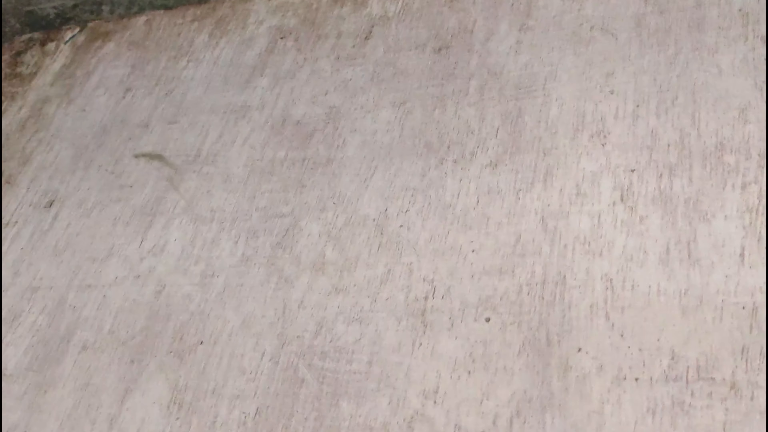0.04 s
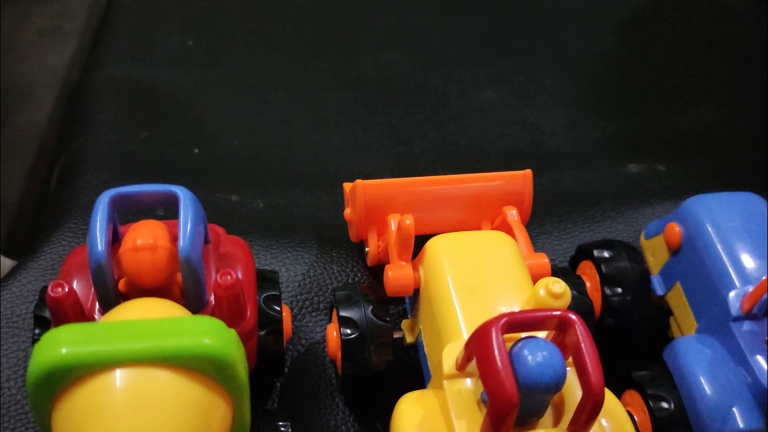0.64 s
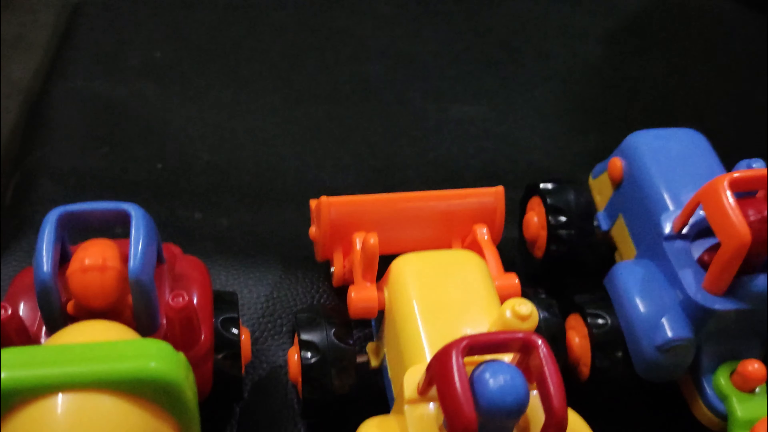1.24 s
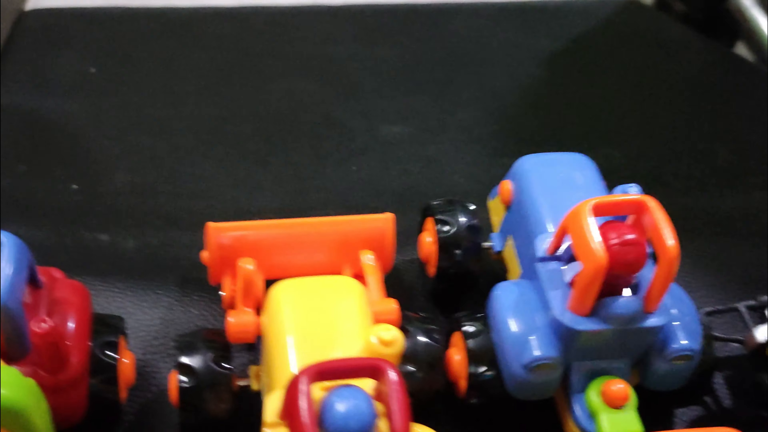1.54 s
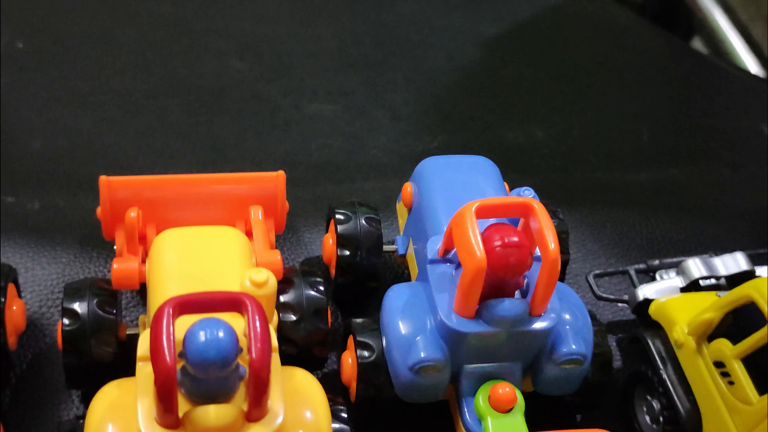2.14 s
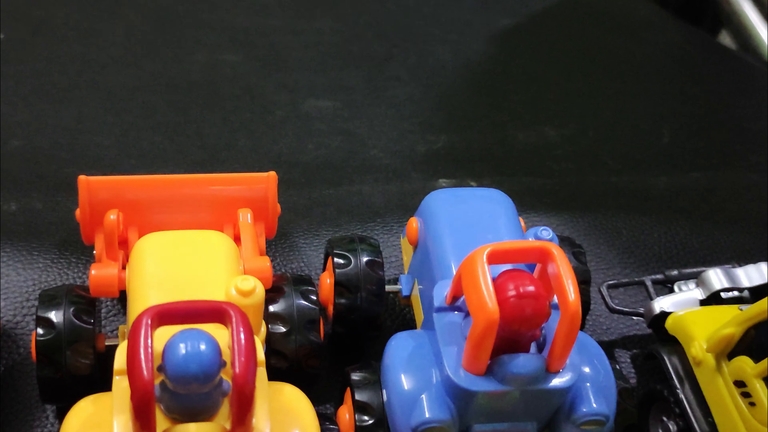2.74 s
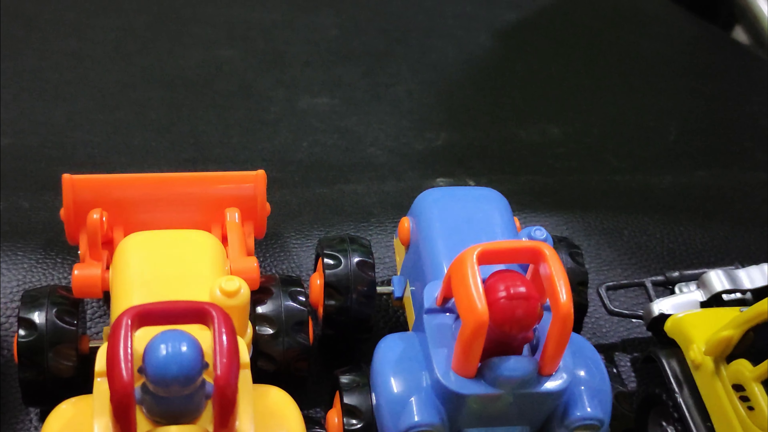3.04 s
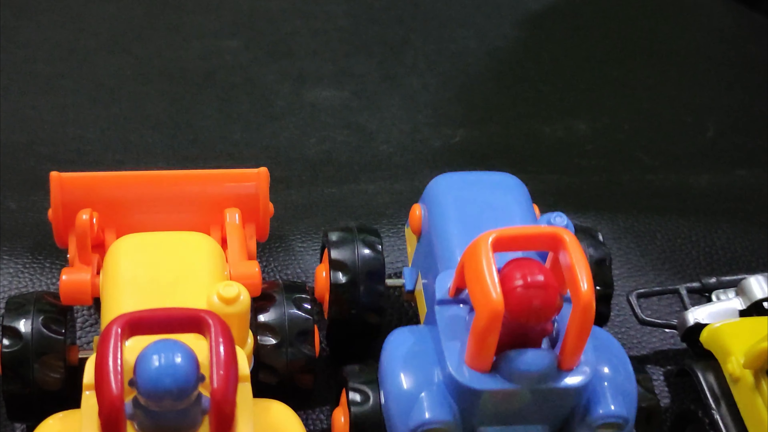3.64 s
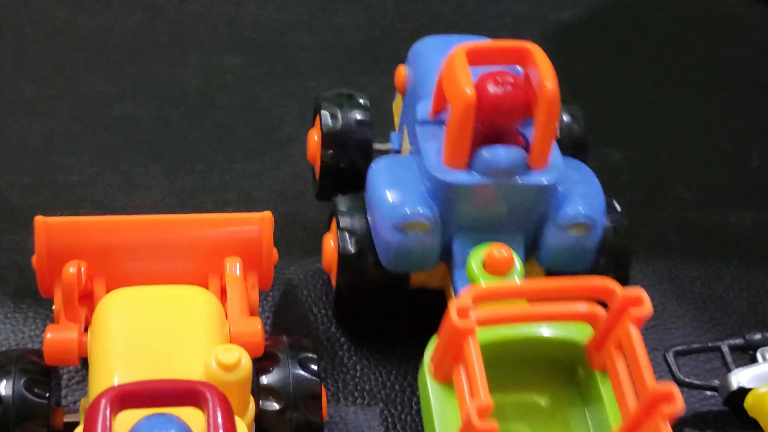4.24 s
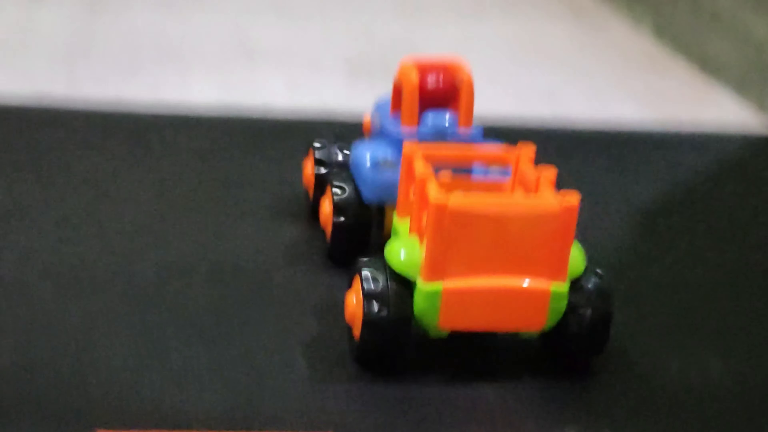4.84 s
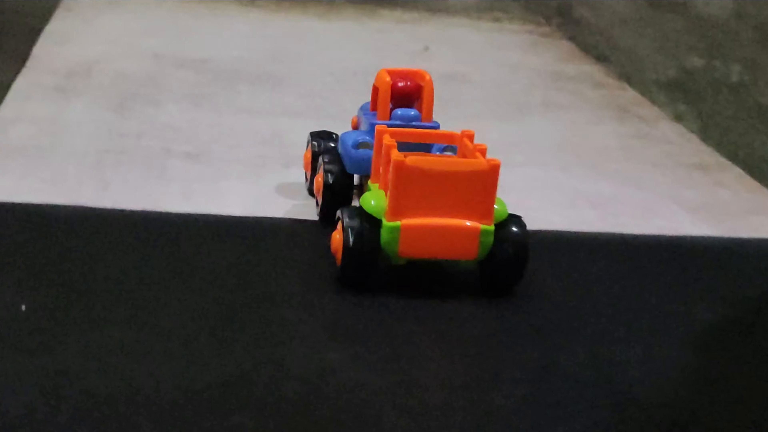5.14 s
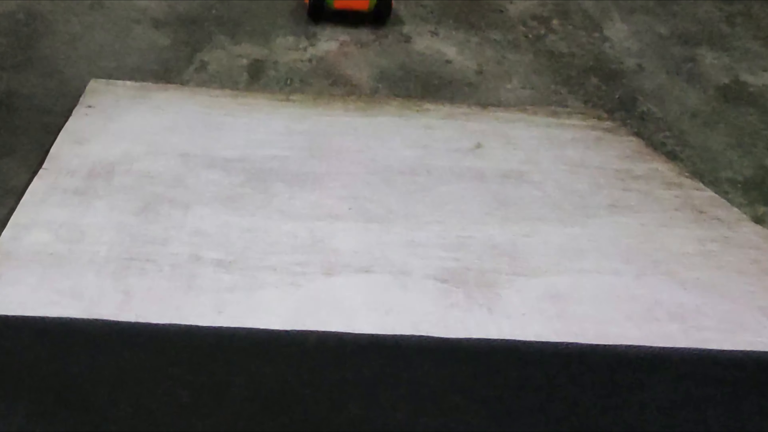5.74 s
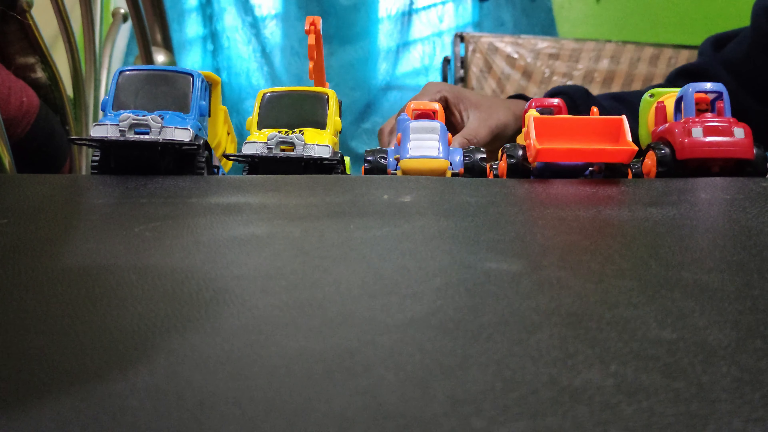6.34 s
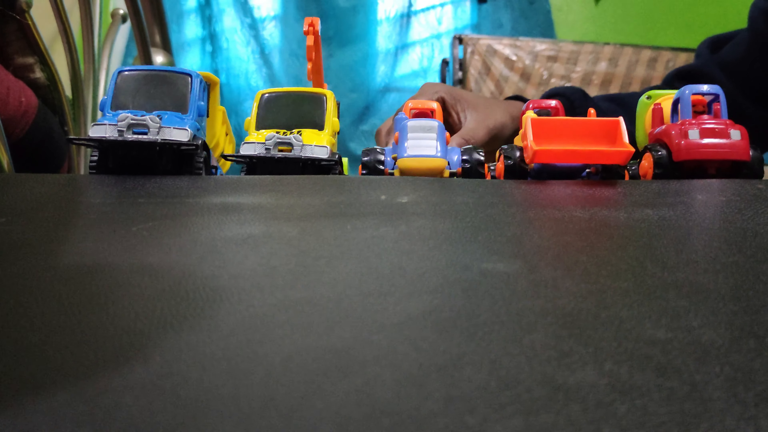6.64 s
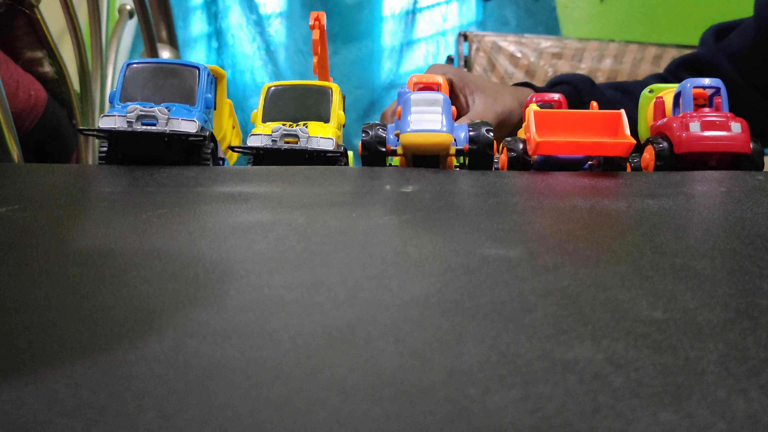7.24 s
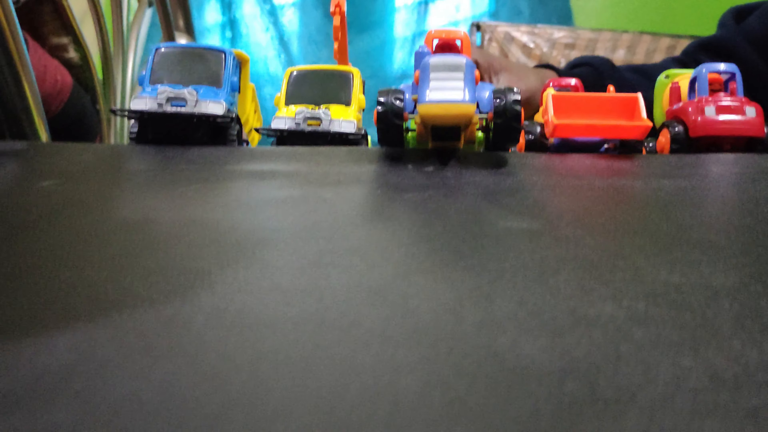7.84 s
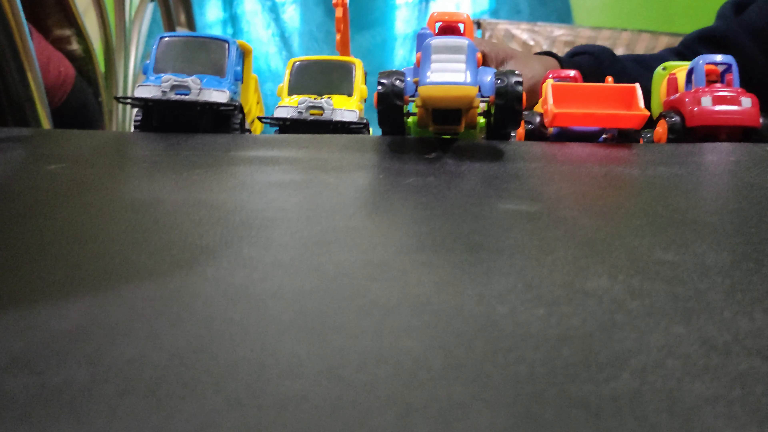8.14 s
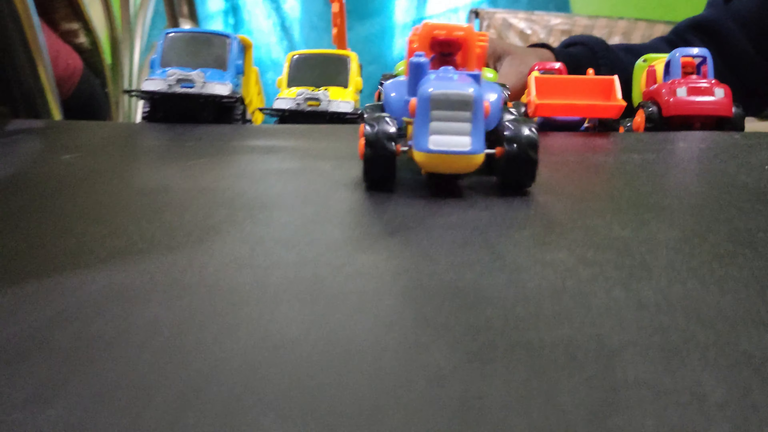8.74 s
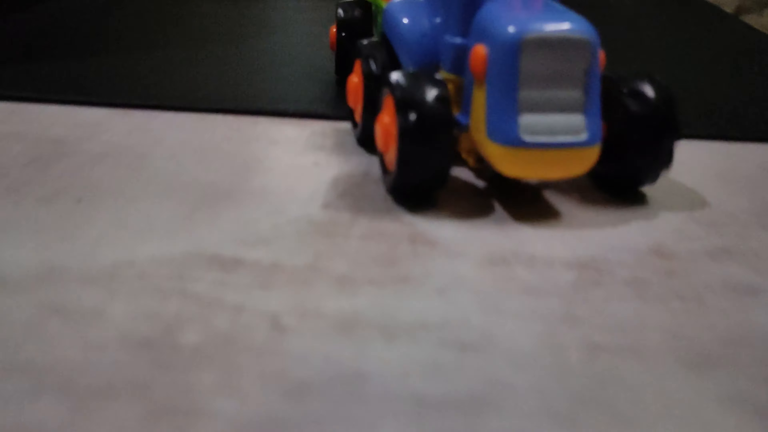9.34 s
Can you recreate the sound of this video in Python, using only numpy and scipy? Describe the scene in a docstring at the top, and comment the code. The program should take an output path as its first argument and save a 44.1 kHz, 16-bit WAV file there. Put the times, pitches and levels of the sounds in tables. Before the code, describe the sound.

A plastic toy tractor clicks, rolls away with a rising gear whir and crashes, then rolls back toward the microphone in a quiet room.

```python
"""Toy tractor on a mat and board

A plastic tractor with a geared flywheel is handled, then rolls twice, close to the microphone in a quiet room.
Nudged, its gear teeth tick one by one; let go down the slope, they merge into a rising whir. Shell and trailer
click, wheels thump and rumble. The first run goes away, over mat and board, and ends in a crash on the floor.
Then the scene changes, and the second comes down the mat toward the microphone."""
import sys
import numpy as np
from scipy import signal
from scipy.fft import rfft, irfft
from scipy.io import wavfile
from scipy.ndimage import uniform_filter1d

SR = 44100
rng = np.random.default_rng(int(sys.argv[2]) if len(sys.argv) > 2 else 0)


def master(y):
    """Save y as 16-bit WAV."""
    cut = np.clip(np.atleast_2d(y).T, -1, 1)
    pcm = np.round(cut * 32767)  # scale
    wavfile.write(sys.argv[1], SR, pcm.astype(np.int16))


N = 414540
TIME = np.arange(N) / SR
AWAY_START_S, TOWARD_START_S = 4.40, 8.41
PAUSE_START_S, PAUSE_END_S = 5.931, 6.652
HAND_TEETH_PER_S = 50  # slow turning by hand
BAND_LIMIT_HZ = 7620

# the toy landing on the floor and bouncing: start_s, level_db
LANDINGS = [(5.7851, -12), (5.7885, -9), (5.799, -18), (5.853, -14.5)]
# modes of the board: pitch_hz, level_db, t60_s
BOARD_MODES = [(98, -12, 0.1), (161, 0, 0.15), (208, -2.5, .18), (250, -2.5, 0.2), (323, -9, .2),
               (397.4, -5.5, .22), (455, -8, .2), (571, -6, 0.16), (643, -8, 0.1), (713, -5.5, .18),
               (820, -12, .18), (975, -7, .18)]
# spectra of plastic hiss, sharp crack, hollow knock and slow, dark whir: frequency_hz, level_db
HISS = [(3700, -20), (4250, -13), (5600, -9), (5950, 2), (6220, -1), (6480, 4), (7350, 4), (7700, -4)]
CRACK = [(400, -23), (850, -9), (1250, -10), (1550, -1), (2050, -.6), (2600, -10), (3500, -21), (4100, -33)]
KNOCK = [(250, -11), (380, 0), (540, 1), (720, -3), (950, -5), (1150, -12), (5000, -48)]
WHIR_SLOW = [(500, -22), (1050, -14), (1300, -2), (2250, 1), (2650, -6), (3200, -17), (4300, -27),
             (7000, -26)]


def amp(db):
    """Decibels to gain."""
    return 10 ** (np.asarray(db) / 20)


def unit(x):
    """Scales to rms 1."""
    return x / np.sqrt(np.mean(x ** 2) + 1e-20)


def unit_peak(x):
    """Scales the loudest 4 ms to rms 1."""
    return x / np.sqrt(uniform_filter1d(x ** 2, 176, mode="constant").max() + 1e-20)


def add(mix, start_s, sound):
    """Mixes a sound in at the given time."""
    part = mix[max(round(start_s * SR), 0):][:len(sound)]
    part += sound[:len(part)]


def wander(per_s):
    """Smooth random drift of rms about 1."""
    knots = rng.standard_normal(N // 100)
    return np.interp(TIME * per_s, np.arange(len(knots)), knots)


def swell(start, end, attack_s, release_s):
    """Attack, hold and release, between 0 and 1."""
    return np.clip(np.minimum((TIME - start) / attack_s, (end - TIME) / release_s), 0, 1)


def response(spectrum, size=4096):
    """Causal impulse response of energy 1 with the given spectrum and falling ends."""
    hz, db = np.transpose(spectrum)
    log_hz = np.log(np.fft.rfftfreq(size, 1 / SR) + 1)
    outside = np.maximum(np.log(hz[0]) - log_hz, 0) + np.maximum(log_hz - np.log(hz[-1]), 0)
    curve_db = np.interp(log_hz, np.log(hz), db) - 30 * outside
    log_gain = np.log(amp(np.maximum(curve_db, -90)))
    log_gain -= 4 * np.clip((np.exp(log_hz) - BAND_LIMIT_HZ) / 1500, 0, 1)
    cepstrum = irfft(log_gain)
    cepstrum[1:size // 2] *= 2  # fold to minimum phase
    cepstrum[size // 2 + 1:] = 0
    impulse = irfft(np.exp(rfft(cepstrum)))[:size // 2]
    return impulse / np.linalg.norm(impulse)


def colour(x, spectrum):
    """Passes x through a body with the given spectrum."""
    return signal.oaconvolve(x, response(spectrum))[:len(x)]


def note(t, hz, t60):
    """One dying resonance with a quick onset."""
    return np.sqrt(2) * np.cos(2 * np.pi * hz * t) * amp(-60 * t / t60) * (1 - np.exp(-t / .00043))


def resonate(x, modes, length_s):
    """Drives a set of modes with x."""
    t = np.arange(int(length_s * SR)) / SR
    impulse = sum(amp(db) * note(t, hz, t60) for hz, db, t60 in modes)
    return signal.oaconvolve(x, impulse / np.linalg.norm(impulse))[:N]


def ring(modes, t, damping, spread):
    """Decaying modes; each blow lands elsewhere and shares its force differently."""
    hz, db, t60 = np.transpose(modes)[:, :, None]
    share, detune = rng.standard_normal((2, len(hz), 1))
    decay = amp(db - 60 * t * damping / np.maximum(t60, .005))
    partials = share * decay * np.sin(2 * np.pi * hz * (1 + spread * detune) * t)
    return unit_peak(partials.sum(0))


def burst(t, t60, spectrum):
    """A short dying chatter of contact, coloured by the struck part."""
    decay = amp(-60 * t / t60)
    onset = 1 - np.exp(-t / .0009)
    chatter = colour(rng.standard_normal(len(t)) * decay * onset, spectrum)
    return chatter * np.sqrt(np.sum(decay ** 2) / np.sum(chatter ** 2))


def grains(per_s, spread_db):
    """Tiny random impacts of uneven size, rms 1."""
    size = amp(spread_db * np.minimum(rng.exponential(1, N), 4)) * rng.choice([-1, 1], N)
    return unit(size * (rng.random(N) < per_s / SR))


def effort(start, rise_s, fall_s):
    """The hand presses harder, then lets off."""
    return swell(start, start + rise_s + fall_s, rise_s, fall_s)


def coasting(start, teeth_per_s, gain_per_s):
    """Teeth per second of a toy that speeds up evenly down the slope."""
    return np.maximum(teeth_per_s + gain_per_s * (TIME - start), HAND_TEETH_PER_S)


def by_speed(rate, start, end, db, doubling_db):
    """Gain of a rolling noise: db at 450 teeth per second, more with each doubling of speed."""
    contact = swell(start, end, attack_s=.015, release_s=.12)
    return contact * amp(db + doubling_db * np.log2(rate / 450))


def room_tone():
    """Room air, a wavering hum until the pause and faint far-off tones, each an arch of pitch."""
    # spectrum of the air: frequency_hz, level_db
    air = [(25, -29), (45, -2.5), (85, 1), (140, -3.5), (260, -5.5), (420, -12), (1150, -21), (2100, -24.5),
           (4300, -39.5), (5600, -39), (6100, -31), (7600, -29)]
    # far-off tones: start_s, length_s, top_hz, sag_hz, level_db
    far_tones = [(1.28, .17, 742, 18, -68), (6.64, .14, 480, 4, -64), (6.95, 1.32, 596, 2, -70.5),
                 (7.16, .19, 626, 12, -64), (8.05, .31, 402, 70, -65)]
    hum_hz, hum_db = 200, -65
    out = amp(-59.5) * colour(rng.standard_normal(N), air) * amp(wander(per_s=7.3))
    waver = 1 + .017 * wander(per_s=50)
    fade = amp(1.7 * wander(per_s=39))
    tones = [(hum_hz, amp(hum_db) * (TIME < PAUSE_START_S))]
    for start, length, top_hz, sag_hz, db in far_tones:
        arch = np.sin(np.pi * np.clip((TIME - start) / length, 0, 1))
        gain = amp(db) * swell(start, start + length, attack_s=.04, release_s=.04)
        tones.append((top_hz - sag_hz * (1 - arch), gain))
    for hz, gain in tones:
        out += np.sqrt(2) * gain * fade * np.sin(2 * np.pi * np.cumsum(hz * waver) / SR)
    return out


def room(x, near_db, tail_db, t60):
    """Quick reflections from the board and toys, the nearest wall's echo and a small room's tail."""
    wall_s, wall_db = .0155, -14
    t = np.arange(SR // 2) / SR
    near, far = rng.standard_normal((2, len(t))) * (rng.random((2, len(t))) < 2500 / SR)
    near *= amp(-60 * t / .02) * (t > .002)
    far *= amp(-60 * t / t60) * (t > .012)
    echoes = amp(near_db) * near / np.linalg.norm(near) + amp(tail_db) * far / np.linalg.norm(far)
    echoes[round(wall_s * SR)] += amp(wall_db)
    return x + signal.oaconvolve(x, echoes)[:N]


def rustle():
    """A soft, dull rustle at the start."""
    return amp(-63) * colour(grains(per_s=2500, spread_db=1.5), KNOCK) * (TIME < .123)


def fingers():
    """Soft swells of fine friction on the shell, and a light slide as the grip changes."""
    # fingers rubbing the plastic: start_s, length_s, level_db
    rubs = [(1.101, .18, -61.5), (1.546, 0.11, -61), (1.81, .08, -61), (2.178, 0.066, -62),
            (2.592, 0.35, -65), (3.018, 0.091, -63.5)]
    stroke = np.zeros(N)
    for start, length, db in rubs:
        add(stroke, start, amp(db) * np.hanning(int(length * SR)))
    grip = amp(-71) * swell(3.03, 3.7, attack_s=.012, release_s=.62)
    slide = grip * grains(per_s=3000, spread_db=1.5)
    rub = stroke * grains(per_s=1400, spread_db=.5)
    return colour(rub, CRACK) + amp(-7.5) * colour(rub, HISS) + colour(slide, HISS)


def taps():
    """Small dull taps while the toy is held, a few cycles each."""
    # taps: start_s, level_db, pitch_hz
    touches = [(6.926, -41.5, 315), (7.604, -43, 568), (7.749, -45.5, 595), (7.871, -46, 587),
               (8.08, -46.5, 623), (8.261, -39, 880), (8.406, -44, 1050)]
    out, t = np.zeros(N), np.arange(SR // 20) / SR
    for start, db, hz in touches:
        tap = np.sin(2 * np.pi * hz * t) * amp(-60 * t / .011)
        add(out, start, amp(db - 3.5) * unit_peak(tap))
    return out


def clicks():
    """Plastic parts knock: a crack, a ping, a faint ring of the shell; hard hits add edge and snap."""
    # contacts: start_s, level_db, edge_db, snap_db, ping_hz
    contacts = [(.452, -69, -6, 10, 2600), (.510, -66, -4, 8, 2600), (1.2002, -44, -18, -15, 1900),
                (1.4426, -36.5, -25, -20, 1950), (1.4581, -26, -22, -14, 1650),
                (1.5145, -38.5, -17, -14, 1550), (1.5264, -40, -16, -14, 1750),
                (1.612, -42, -30, -20, 1850), (1.8572, -30, -26, -18, 1900), (2.0496, -56, -8, -12, 2400),
                (2.53, -50, -25, -17, 1900), (2.5646, -51.5, -12, -10, 2400),
                (2.7551, -24.5, -23, -14, 2020), (3.311, -52, -20, -22, 2250),
                (3.7312, -53, -20, -20, 2200), (4.2867, -26.5, -17, -9, 2100), (4.294, -30, -18, -10, 1700),
                (4.3128, -25, -17, -10, 2150), (4.480, -31, -22, -16, 2150), (4.5491, -30, -15, -14, 2150),
                (4.571, -31, -15, -14, 2120), (4.581, -28, -10, -12, 1300), (4.604, -31, -14, -16, 2150),
                (4.6321, -31, -5, -9, 2130), (4.654, -35, -9, -15, 2200), (4.6825, -28, -4, -9, 2150),
                (4.702, -22.5, -5, -9, 2160), (4.7214, -27, -3, -8, 2250), (5.2764, -24, -18, -18, 950),
                (5.3694, -28, -3, -8, 2100), (8.2604, -34.5, -2, -4, 2600), (8.4058, -34, -11, -9, 2200),
                (8.6243, -30, -9, -10, 2000), (8.6617, -35, -4, -7, 1350), (8.7281, -31, -8, -8, 1450),
                (8.7435, -28, -8, -6, 2650), (8.767, -21.5, -6, -10, 2100), (9.362, -20, -6, -16, 1400),
                (9.385, -20, -6, -16, 2100)]
    # modes of the plastic shell: pitch_hz, level_db, t60_s
    shell_modes = [(845, -11, .16), (1534, -1, .19), (2030, -2, .14), (2595, -11, .13), (3470, -18, .11)]
    # spectrum of a hard contact: frequency_hz, level_db
    hard_edge = [(1900, -22), (2550, 5.5), (3000, -4.5), (3450, 2.5), (3900, -15.5), (5300, -18.5),
                 (7000, -25.5)]
    out, t = np.zeros(N), np.arange(SR // 4) / SR
    for start, db, edge_db, snap_db, hz in contacts:
        part = amp(-1.5) * burst(t, t60=.025, spectrum=CRACK) + amp(-4.5) * note(t, hz, t60=.032)
        shell = amp(-19) * ring(shell_modes, t, damping=1, spread=.012)
        edge = amp(edge_db + 2.5) * burst(t, t60=.024, spectrum=hard_edge)
        snap = amp(snap_db) * burst(t, t60=.032, spectrum=HISS)
        add(out, start, amp(db) * (amp(-1.7) * part + shell + edge + snap))
    return out


def thumps():
    """A dropping wheel, or a bump of the held toy, gives the board one low push, then the toy and the board
    ring."""
    # wheels dropping on mat or board, and early low bumps as the held toy is handled: start_s, level_db,
    # knock_db, boom_hz, boom_t60_s
    drops = [(1.737, -46, -75, 112, .3), (1.859, -48, -62, 100, .25), (2.756, -39, -66, 150, .12),
             (4.281, -34, -54, 225, .06), (4.579, -18, -50, 205, .06), (4.602, -24, -54, 205, .06),
             (4.700, -17, -25, 250, .07), (4.7205, -19, -22, 235, .11), (5.216, -17, -20.5, 250, .07),
             (5.276, -22, -19, 170, .18), (5.368, -23, -37, 306, .1), (5.457, -23.5, -22, 315, .08),
             (5.657, -22, -17, 975, .22), (8.591, -29, -41, 355, .09), (8.617, -26, -44, 102, .3),
             (8.743, -27, -40, 270, .025), (8.767, -18.5, -33, 275, .03), (8.791, -33, -29, 240, .2),
             (9.361, -16, -21, 255, .07), (9.384, -17, -24, 110, .12)]
    # spectrum of the low thud: frequency_hz, level_db
    thud = [(40, -29.5), (90, -7), (170, 0), (260, 0), (400, -12), (2000, -53.5)]
    out, t = np.zeros(N), np.arange(SR // 3) / SR
    push = amp(-6.5) * unit_peak(response(thud, size=2 * len(t)))
    upper_modes = [mode for mode in BOARD_MODES if mode[0] > 300]  # rung by a hard knock
    for start, db, knock_db, hz, boom_t60 in drops:
        boom = amp(-5) * note(t, hz, boom_t60) + amp(-13) * burst(t, t60=.15, spectrum=thud)
        board = amp(-18) * ring(BOARD_MODES, t, damping=.64, spread=.013)
        knock = amp(-5.5) * burst(t, t60=.085, spectrum=KNOCK)
        knock += amp(-11.5) * ring(upper_modes, t, damping=1, spread=.013)
        add(out, start, amp(db) * (boom + push + board) + amp(knock_db) * knock)
    return out


def crash(tail_db, t60):
    """The toy hits the floor and bounces; its loose parts clatter and die away."""
    # spectrum of the loose parts: frequency_hz, level_db
    clatter = [(500, -18), (1350, -2), (1750, -7.5), (2150, 4), (2600, -9), (3500, -8), (4200, -16.5),
               (5500, -17.5), (7300, -9.5)]
    since, t = TIME - LANDINGS[0][0], np.arange(SR // 10) / SR
    decay = amp(tail_db - 60 * np.maximum(since, 0) / t60) * (since > 0)
    out = colour(grains(per_s=1500, spread_db=5.5) * decay, clatter)
    for start, db in LANDINGS:
        add(out, start, amp(db) * burst(t, t60=.014, spectrum=clatter))
    return out


def wheels(away, toward):
    """Treads murmur on the soft mat and drum the bare board into its modes."""
    # spectra of the mat, the deeper mat heard from its surface, and the board: frequency_hz, level_db
    mat = [(50, -15), (130, 3), (200, 2.5), (360, -8), (520, -11), (750, -19)]
    mat_near = [(45, -12), (80, 1), (102, 4.5), (135, -3.5), (250, -8.5), (520, -18.5), (750, -33)]
    rumble = [(45, -24.5), (100, -13), (150, -1), (210, -2), (300, 4), (450, -3.5), (980, -1), (1100, -11),
              (1500, -10), (2500, -21), (6000, -52)]
    mat_away = by_speed(away, start=4.1, end=5.26, db=-44.5, doubling_db=4.5)
    mat_toward = by_speed(toward, start=8.57, end=9.5, db=-38.5, doubling_db=1)
    board_away = by_speed(away, start=5.21, end=5.825, db=-39.2, doubling_db=17.5)
    murmur = mat_away * colour(grains(per_s=1100, spread_db=1.5), mat)
    murmur += mat_toward * colour(grains(per_s=1100, spread_db=1.5), mat_near)
    treads = board_away * grains(per_s=1500, spread_db=1.5)
    drumming = resonate(treads, BOARD_MODES, length_s=.25)
    return amp(-2.1) * murmur + amp(-2.23) * colour(treads, rumble) + amp(-9.5) * drumming


def teeth(rate, slop_s, uneven_db):
    """One pulse for each gear tooth, a little early or late, weak or strong; power 1 at any speed."""
    due = np.flatnonzero(np.diff(np.floor(np.cumsum(rate) / SR)))
    late, force = rng.standard_normal((len(due), 2)).T
    struck = np.clip(due + np.round(late * slop_s * SR).astype(int), 0, N - 1)
    pulses = np.zeros(N)
    pulses[struck] = unit(amp(uneven_db * force)) * np.sqrt(SR / rate[due])
    return pulses


def housing(drive):
    """The teeth ring the narrow resonances of the gear housing."""
    # housing modes, heard from the front: pitch_hz, level_db, t60_s
    modes = [(1320, -9, .02), (2090, -12, .045), (2680, 1, .012), (2870, 1, .014), (3450, -11, .03)]
    return resonate(drive, modes, length_s=.1)


def nudged_gears():
    """Turned by hand, the gears run haltingly; each tooth snaps past the next with a tiny scrape."""
    # hand turns, then those facing the microphone: start_s, rise_s, fall_s, level_db, top_teeth_per_s
    turns = [(.57, .25, .12, -57.5, 80), (.96, .1, .12, -65.5, 52), (1.69, .075, .015, -57.5, 63),
             (2.24, .05, .22, -65, 52), (3.76, .1, .3, -61, 64)]
    front_turns = [(6.84, .16, .14, -67, 68), (7.05, .32, .1, -65, 92), (7.66, .04, .14, -69, 85),
                   (8.26, .02, .3, -62, 190)]
    # tick spectra for these two positions: frequency_hz, level_db
    tick = [(1080, -28), (1280, 1), (1700, -.6), (2050, -4), (2600, -11.5), (3050, -16), (3950, -36),
            (5600, -30), (5950, -22), (7200, -18.5)]
    front_tick = [(700, -14), (1100, -8), (1400, 2.5), (1750, -5), (2050, -2), (2400, -9), (2850, -.6),
                  (3950, -25), (7200, -14)]
    slip = np.exp(-np.arange(SR // 100) / SR / .0014)
    out = np.zeros(N)
    for pushes, body, housing_db in [(turns, tick, -24), (front_turns, front_tick, -3)]:
        rate, gain = np.full(N, float(HAND_TEETH_PER_S)), np.zeros(N)
        for start, rise_s, fall_s, db, top in pushes:
            push = effort(start, rise_s, fall_s) ** .4  # speed and loudness follow the effort
            rate = np.maximum(rate, HAND_TEETH_PER_S + (top - HAND_TEETH_PER_S) * push)
            gain = np.maximum(gain, amp(db) * push)
        pulses = teeth(rate * amp(1.2 * wander(per_s=30)), slop_s=.0009, uneven_db=1.2)
        scrape = signal.oaconvolve(pulses, slip / np.linalg.norm(slip))[:N] * rng.standard_normal(N)
        spurts = amp(1.2 * wander(per_s=22))
        ticks = gain * spurts * (.35 * pulses + .9 * scrape)
        out += colour(ticks, body) + amp(housing_db) * housing(ticks)
    return out


def running_gears(rate, body, whir_gain, hiss_gain, scrape_share, flutter_db, housing_db):
    """Fast teeth whine, taking on the body's colour with speed; loose axles scrape and flutter."""
    dark_teeth_per_s, bright_teeth_per_s = 210, 350
    mesh = teeth(rate * (1 + .008 * wander(per_s=70)), slop_s=.000035, uneven_db=2.8)
    low_cut = signal.butter(1, 450, "high", fs=SR, output="sos")
    scrape = signal.sosfilt(low_cut, grains(per_s=7000, spread_db=3.3))
    drive = np.sqrt(1 - scrape_share) * mesh + np.sqrt(scrape_share) * scrape
    flutter = wander(per_s=76)
    drive *= whir_gain * amp(flutter_db * flutter)
    bright = np.sin(np.interp(rate, [dark_teeth_per_s, bright_teeth_per_s], [0, np.pi / 2])) ** 2
    whir = colour(drive * bright, body) + colour(drive * (1 - bright), WHIR_SLOW)
    hiss = colour(grains(per_s=5500, spread_db=3.5) * hiss_gain * amp(2.2 * flutter), HISS)
    return whir + amp(housing_db) * housing(drive) + hiss


def shoves():
    """A firm push spins the flywheel up; speed, whir and hiss follow the effort."""
    # firm pushes: start_s, rise_s, fall_s, whir_db, hiss_db, top_teeth_per_s
    pushes = [(3.97, .3, .14, -43, -58, 260), (7.38, .13, .36, -59, -78, 230)]
    out = np.zeros(N)
    for start, rise_s, fall_s, whir_db, hiss_db, top in pushes:
        push = effort(start, rise_s, fall_s)
        rate = HAND_TEETH_PER_S + (top - HAND_TEETH_PER_S) * push
        whir, hiss = amp(whir_db) * push ** 1.45, amp(hiss_db) * push ** .8
        out += running_gears(rate, WHIR_SLOW, whir, hiss,
                             scrape_share=.48, flutter_db=1.3, housing_db=-16)
    return out


def gearbox(rate, ring_hz, width_hz, db):
    """Overtones of the teeth sweep through a narrow housing resonance, fading as the toy leaves."""
    drive = teeth(rate, slop_s=.00007, uneven_db=2.5)
    pole = np.exp((2j * np.pi * ring_hz - np.pi * width_hz) / SR)
    singing = signal.lfilter([1], np.poly([pole, pole]), drive + 1e-18).real
    return amp(db) * swell(AWAY_START_S, 5.42, attack_s=.65, release_s=.3) * unit(singing)


def roll_away(rate):
    """The first run, away from the microphone: whir and hiss grow with speed and the gearbox sings."""
    # spectrum of the whir going away: frequency_hz, level_db
    body = [(300, -16), (520, -11), (720, -18), (1050, -9), (1330, -1), (1700, -7), (2130, 0), (2680, -2),
            (2950, -14), (3500, -10), (3900, -17), (5300, -21), (7000, -31)]
    whir = by_speed(rate, AWAY_START_S, np.inf, db=-41.5, doubling_db=5.8)
    hiss = by_speed(rate, AWAY_START_S, np.inf, db=-53, doubling_db=9.5)
    gears = running_gears(rate, body, whir, hiss, scrape_share=.55, flutter_db=1.6, housing_db=-18)
    return gears + gearbox(rate, ring_hz=2644, width_hz=310, db=-42.3)


def roll_toward(rate):
    """The second run grows more steeply, as the toy also nears the microphone."""
    # spectrum of the whir head-on: frequency_hz, level_db
    body = [(250, -14), (480, -5.5), (730, -15), (930, -6), (1100, -7), (1350, 0), (1750, -9), (2150, -10),
            (2550, -1), (3200, -8), (3500, -8), (3800, -19), (5300, -17), (7000, -39.5)]
    whir = by_speed(rate, TOWARD_START_S, np.inf, db=-37.5, doubling_db=9.3)
    hiss = by_speed(rate, TOWARD_START_S, np.inf, db=-46, doubling_db=14.5)
    return running_gears(rate, body, whir, hiss, scrape_share=.55, flutter_db=1.3, housing_db=-11)


def scene():
    """The toy close by in a small, quiet room, in mono."""
    braking = 2000 * np.maximum(TIME - LANDINGS[0][0], 0)  # teeth per second lost since the crash
    away = coasting(AWAY_START_S, teeth_per_s=146, gain_per_s=530)
    away = np.maximum(away - braking, HAND_TEETH_PER_S)
    toward = coasting(TOWARD_START_S, teeth_per_s=80, gain_per_s=570)
    gears = nudged_gears() + shoves() + roll_away(away) * (TIME < PAUSE_START_S) + roll_toward(toward)
    toy = gears + wheels(away, toward) + clicks() + thumps() + taps() + fingers()
    toy += crash(tail_db=-25.5, t60=.5)
    low_cut = signal.butter(2, 65, "high", fs=SR, output="sos")  # the deepest bass is taken out of the toy
    toy = signal.sosfilt(low_cut, toy)
    return (room(toy, near_db=-11, tail_db=-10.5, t60=.12) + room_tone() + rustle())[None]


def record(dry):
    """The sound cuts out briefly near the start and between the runs; the top treble is cut off."""
    gaps_s = [(.123, .146), (PAUSE_START_S, PAUSE_END_S)]
    silent = sum((TIME > start) & (TIME < end) for start, end in gaps_s)
    gate = uniform_filter1d(1. - silent, size=64)
    low_pass = signal.firwin(801, BAND_LIMIT_HZ, window=("kaiser", 8), fs=SR)
    return signal.oaconvolve(dry * gate, low_pass[None], "same")


dry = scene()
out = record(dry)
master(out)
```